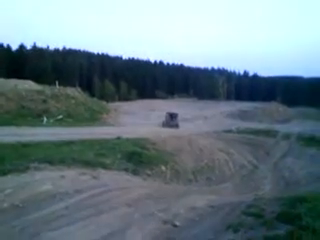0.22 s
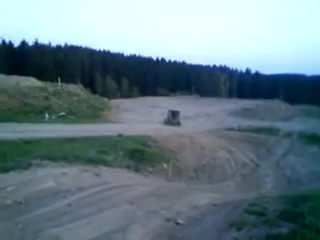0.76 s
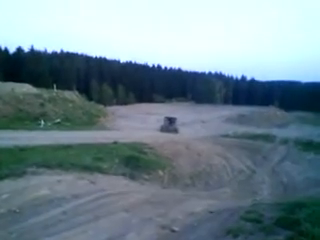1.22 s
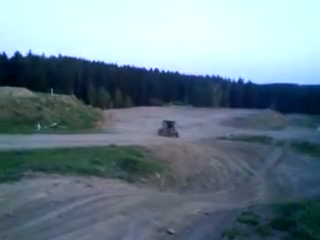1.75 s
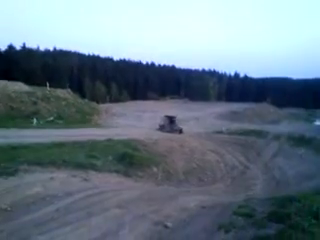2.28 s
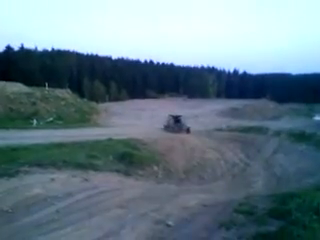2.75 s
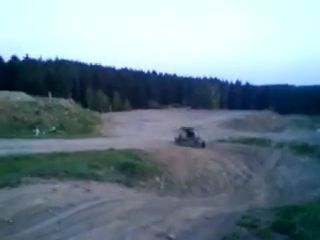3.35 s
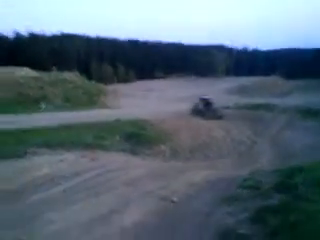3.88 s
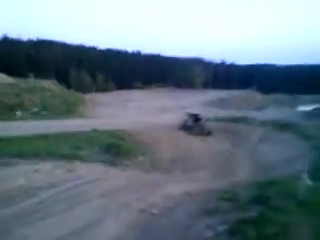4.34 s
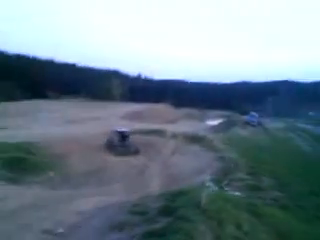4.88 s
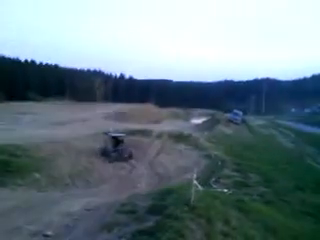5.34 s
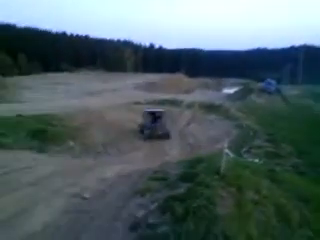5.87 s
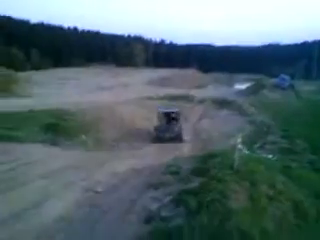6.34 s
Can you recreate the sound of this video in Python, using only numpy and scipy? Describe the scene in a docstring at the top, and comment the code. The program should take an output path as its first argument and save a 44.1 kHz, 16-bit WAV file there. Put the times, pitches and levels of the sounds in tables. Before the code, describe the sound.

An open buggy's rough engine blips its throttle three times, crawls unevenly, then pulls away harder as fingers click on the camera.

```python
"""Three throttle blips, a crawl and a pull-away of an open buggy with an uneven four-cylinder engine on a dirt track.
Pressure pulses boom in the silencer and bark in the tailpipe; a leaking joint rasps, most at one cylinder.
Clattering valve gear and tyres on grit add noise, a loose part chinks, and the forest edge gives a faint echo.
The hand that holds a small camera clicks and rubs on its case, over thin whines and a light breeze."""
import sys
import numpy as np
from scipy import signal
from scipy.fft import rfft, irfft
from scipy.io import wavfile
from scipy.ndimage import uniform_filter1d

SR = 44100
rng = np.random.default_rng(int(sys.argv[2]) if len(sys.argv) > 2 else 0)


def persist_wave(psi):
    """Save psi, clipped to +-1, as 16-bit WAV."""
    counts = np.round(np.clip(psi, -1, 1) * 32767).astype(np.int16)
    wavfile.write(sys.argv[1], SR, np.atleast_2d(counts).T)


N = 291501

# cylinders in firing order: charge_surplus [relative], bark_db, leak_db [before scatter and trims]
CYLINDERS = [(-0.21, -8, -10), (-0.055, -10, -8.5), (0.25, -9, -22), (0.25, -4, 0)]
# throttle bursts, three blips and the pull-away: opens_s, shuts_s, opening_firing_hz, shutting_firing_hz,
# boom_db, bark_db, final_rasp_db, rasp_growth_db [levels before detuning and trims]
THROTTLE = [(0.192, 0.39, 73.36, 84.05, -14, -38, -25.5, 2), (0.719, 1.24, 51.01, 76.87, -16, -39, -29, 3),
            (1.502, 2.27, 40.91, 68.8, -16.5, -43.5, -28.5, 18.5),
            (5.715, 6.639, 65.38, 97.16, -15.5, -29, -33.5, 1)]


def undb(db):
    """The decibel is logarithmic: 20 dB is a factor of ten in amplitude."""
    return 10 ** (np.asarray(db) / 20)


def curves(table):
    """Linear interpolation: each column of a table of (s, ..) rows, sample by sample."""
    s, *columns = np.transpose(table)
    return [np.interp(np.arange(N) / SR, s, c) for c in columns]


def unit(x):
    """Power normalisation: scaled to rms 1."""
    return x / np.sqrt(np.mean(x ** 2))


def steady(x, size=6000):
    """Running power normalisation to rms 1; a long window (samples) keeps the shape of single firings."""
    power = uniform_filter1d(uniform_filter1d(x ** 2, size), size // 2)
    return x / np.sqrt(power + 1e-12)


def noise():
    """White noise: equal mean power at all frequencies."""
    return rng.standard_normal(N)


def walk(rate):
    """Slow random modulation: levels drawn at a rate (Hz) and slewed by a running mean; rms 1."""
    hold = max(int(SR / rate), 1)
    held = noise()[np.arange(N) // hold]
    return unit(uniform_filter1d(held, hold))


def colour(x, points, tilt_db=0, size=8192):
    """Minimum-phase filtering: a causal response of unit energy through (Hz, dB) points, tilted by dB an octave."""
    hz, db = np.transpose(points)
    octave = np.log2(np.maximum(np.arange(size // 2 + 1) * SR / size, 1))
    gain_db = np.interp(octave, np.log2(hz), db + tilt_db * np.log2(hz))
    # beyond either end the response falls by 24 dB an octave
    above, below = np.maximum(octave - np.log2(hz[-1]), 0), np.maximum(np.log2(hz[0]) - octave, 0)
    gain_db -= 24 * (above + below)
    # folding the cepstrum onto positive time gives minimum phase
    cepstrum = irfft(gain_db * np.log(10) / 20)
    ring = irfft(np.exp(rfft(2 * cepstrum[:size // 2], size)))
    return signal.fftconvolve(x, ring / np.linalg.norm(ring))[:len(x)]


def puff(age, rise, fall):
    """Exponential filling and emptying: a puff that swells and dies away, times in units of age."""
    return (1 - np.exp(-age / rise)) * np.exp(-age / fall)


def firings(turns):
    """Cyclic phase: number of the running firing, its cylinder and its age 0-1."""
    number = np.floor(turns).astype(int)
    return number, number % len(CYLINDERS), turns % 1


def churn(turns, repeat, size=1200):
    """Partly periodic turbulence: what comes back alike in every engine cycle forms spectral lines."""
    pattern = rng.standard_normal(size)
    cycle = np.interp(turns / len(CYLINDERS) % 1 * size, np.arange(size), pattern)
    return np.sqrt(repeat) * cycle + np.sqrt(2 * (1 - repeat)) * noise()


def engine_speed():
    """Rotational inertia: the firing rate climbs under throttle, fastest at first, and runs down in between."""
    # idling, then crawling round the bend: time_s, firing_hz
    crawl = [(2.461, 39.68), (2.625, 39.25), (2.826, 52.82), (3.033, 47.47), (3.373, 54.66), (3.59, 49.42),
             (4.153, 55.63), (4.351, 55.68), (4.62, 60.43), (5.002, 60.97), (5.509, 67.03)]
    start_hz = 86.31
    surge_hz = 2.2  # lead over an even climb at the middle of a burst
    t = np.arange(N) / SR
    points, surge = [(0, start_hz), *map(tuple, crawl)], 0
    for opens, shuts, from_hz, to_hz, *_ in THROTTLE:
        points += [(opens, from_hz), (shuts, to_hz)]
        along = np.clip((t - opens) / (shuts - opens), 0, 1)
        surge = surge + surge_hz * (1 - (2 * along - 1) ** 2)
    return curves(sorted(points))[0] + surge


def pedal(opens, shuts):
    """Finite valve travel: the throttle 0-1 opens, holds and shuts in linear ramps."""
    open_s, shut_s = 0.057, 0.027  # lengths of the ramps
    t = np.arange(N) / SR
    return np.clip(np.minimum(.5 + (t - opens) / open_s, 1 - (t - shuts) / shut_s), 0, 1)


def effort(firing_hz, size=4000):
    """Engine load: throttle 0-1, and the boom, bark and rasp levels (dB before trims) that it sets."""
    # edge of the exhaust note while crawling: time_s, bark_db, rasp_db [before trims]
    crawl_edge = [(2.9, -50.5, -34), (3.5, -40.5, -38.5), (4.15, -43.5, -37), (4.8, -42.5, -44),
                  (5.55, -39.5, -37), (5.69, -32, -31.5)]
    crawl_from_s, crawl_to_s = 2.68, 5.74
    crawl_boom_db, crawl_swell_db, swell_hz_per_s = -18.5, 1, 12
    # levels with the throttle shut, before detuning and trims
    boom_db, bark_db, rasp_db = -25.5, -64.5, -43
    edge_lead_s = .028  # bark and rasp die this long before the boom
    # the silencer booms most at one firing rate and less on either side
    tuned_hz, detuned_db_per_octave = 70.2, 4
    t = np.arange(N) / SR

    # while crawling, the boom swells as the engine gathers speed
    hz_per_s = uniform_filter1d(np.gradient(firing_hz) * SR, size)
    crawl_boom = crawl_boom_db + crawl_swell_db * np.tanh(hz_per_s / swell_hz_per_s)
    strokes = [(crawl_from_s, crawl_to_s, crawl_boom, *curves(crawl_edge))]
    for opens, shuts, _, _, open_boom, open_bark, open_rasp, growth in THROTTLE:
        to_go = np.clip((shuts - t) / (shuts - opens), 0, 1)
        strokes.append((opens, shuts, open_boom, open_bark, open_rasp - growth * to_go ** 2))

    throttle = 0
    for opens, shuts, open_boom, open_bark, open_rasp in strokes:
        press, edge = pedal(opens, shuts), pedal(opens, shuts - edge_lead_s)
        throttle = np.maximum(throttle, press)
        boom_db = boom_db + press * (open_boom - boom_db)
        bark_db = bark_db + edge * (open_bark - bark_db)
        rasp_db = rasp_db + edge * (open_rasp - rasp_db)
    detuned_octaves = np.abs(np.log2(firing_hz / tuned_hz))
    return throttle, boom_db - detuned_db_per_octave * detuned_octaves, bark_db, rasp_db


def exhaust(turns, throttle, boom_db, valve_lag=0.13, thump_lag=0.13, coast_lead=0.27,
            scatter_db=2.39, trim_db=-1.8, harmonics=10):
    """Forced resonance: pulses ring the silencer, over a thump at the firing rate, earlier when coasting."""
    # resonances of the silencer: frequency_hz, level_db [relative]
    silencer = [(30, -39.5), (60, 10), (85, 2.5), (115, 2), (155, 4), (185, -2), (212, -11.5), (245, -8.5),
                (280, -16), (320, -17), (380, -34.5), (460, -40.5), (900, -53)]
    # thump at the firing rate: time_s, level_db [rms]
    thump_levels = [(0.0, -20), (0.3, -25.5), (1.2, -26), (1.6, -32), (2.25, -25), (2.36, -35),
                    (5.68, -39.5), (5.77, -24), (6.25, -19.5), (6.6, -21.5)]
    jitter = .003  # spread of the timing, in firing intervals, as are the lags and the lead
    thump_db, = curves(thump_levels)
    number, _, age = firings(turns - valve_lag + .5)
    angle = 2 * np.pi * (age - .5 - jitter * noise()[number])
    # the pulses leave out the fundamental, which the thump mainly supplies
    pulse = sum(np.cos(k * angle) for k in range(2, harmonics + 1))
    pulses = undb(scatter_db * noise()[number]) * pulse
    thump = np.sqrt(2) * np.cos(2 * np.pi * (turns - thump_lag + coast_lead * (1 - throttle)))
    boom = steady(colour(pulses, silencer)) * undb(boom_db + trim_db)
    return boom + thump * undb(thump_db)


def lope(turns, boom_db, lag=0.038, full_db=-27.5, below_boom_db=9):
    """Subharmonic excitation: unequal charges rock the manifold gas once a cycle; shut throttle weakens it."""
    # resonances of the manifold: frequency_hz, level_db [relative]
    manifold = [(40, -15), (80, -8), (115, -4.5), (136, -0.5), (155, -3.5), (185, -9.5), (215, -9),
                (270, -19), (315, -10), (350, -19), (420, -39.5), (700, -45.5)]
    charge_scatter = .04  # relative
    number, cylinder, _ = firings(turns - lag)
    surplus = np.transpose(CYLINDERS)[0][cylinder] + charge_scatter * noise()[number]
    kicks = surplus * np.diff(number, prepend=number[0])
    level_db = np.minimum(full_db, boom_db - below_boom_db)
    return steady(colour(kicks, manifold)) * undb(level_db)


def bark(turns, firing_hz, level_db, lag=0.036, gas=0.1, repeat=0.79, scatter_db=2.0, trim_db=-4.5):
    """Pipe resonance: steep pulse fronts and gas ring the tailpipe; a higher colour takes over at high revs."""
    # tailpipe at lower revs: frequency_hz, level_db [relative]
    tailpipe = [(250, -32), (450, -17), (560, 2.5), (650, 5.5), (820, 0.5), (1000, -12), (1400, -11),
                (2100, -11), (2600, -39), (4000, -23.5), (6000, -51.5)]
    # tailpipe at high revs: frequency_hz, level_db [relative]
    snarl = [(450, -20.5), (700, -4), (830, 3), (960, -1.5), (1150, -10), (1500, -14), (2100, -16.5),
             (2600, -33)]
    # firing rate at the middle of the change, its spread, and the greatest share of the power
    snarl_from_hz, snarl_spread_hz, snarl_share = 87, 2.1, .7
    number, cylinder, age = firings(turns - lag)
    front = np.diff(number, prepend=number[0])
    size = undb(np.transpose(CYLINDERS)[1][cylinder] + scatter_db * noise()[number])
    gas_flow = gas * churn(turns, repeat) * (puff(age, 0.011, .45) + 0.037)
    flow = size * (front + gas_flow)
    high = snarl_share / (1 + np.exp((snarl_from_hz - firing_hz) / snarl_spread_hz))
    low_rev_tone = np.sqrt(1 - high) * steady(colour(flow, tailpipe))
    high_rev_tone = np.sqrt(high) * steady(colour(flow, snarl))
    return (low_rev_tone + high_rev_tone) * undb(level_db + trim_db)


def rasp(turns, level_db, lead=0.24, scatter_db=-1.0, trim_db=-0.5):
    """Turbulent jet noise: gas spits from a leaking joint, hardest once every four firings."""
    # spectrum of the leaking jet: frequency_hz, level_db [relative]
    leak = [(300, -27.5), (600, -16), (820, -5), (1020, -13.5), (1170, 2), (1310, 2.5), (1500, -1.5),
            (1750, -20.5), (2100, -19), (2900, -29.5), (3400, -25.5), (3800, -38), (5000, -42), (8000, -40)]
    leak_repeat = .75  # share of the turbulence that repeats each cycle
    number, cylinder, age = firings(turns + lead)
    size = undb(np.transpose(CYLINDERS)[2][cylinder] + scatter_db * noise()[number])
    spit = puff(age, 0.056, 0.73)
    jet = steady(colour(churn(turns, leak_repeat), leak), size=500)
    return jet * size * spit / spit.max() * undb(level_db + trim_db)


def running_gear(turns):
    """Impact and contact noise: valve gear clatters twice a firing interval; tyres crunch over grit."""
    # running gear through the drive: time_s, clatter_db, tyre_db [before trims]
    gear_levels = [(0.0, -38.5, -47.5), (0.45, -43.5, -52.5), (2.0, -41.5, -50), (2.5, -45, -50.5),
                   (2.9, -38.5, -47), (3.5, -44, -50), (4.1, -41, -44), (5.0, -43.5, -44.5),
                   (5.55, -36, -41.5), (5.9, -38.5, -47.5), (6.3, -36.5, -44.5)]
    # spectrum of the engine clatter: frequency_hz, level_db [relative]
    clatter_colour = [(200, -11), (450, -1.5), (700, 5), (980, -4), (1250, 4), (1500, -0.5), (1800, -14),
                      (2400, -13.5), (5000, -42)]
    # spectrum of tyres and gears: frequency_hz, level_db [relative]
    tyre_colour = [(900, -18.5), (1500, 0.5), (1850, -1), (2150, -4), (2500, -9.5), (3300, -10.5),
                   (4000, -10.5), (5000, -17), (6200, -15), (7200, -36)]
    clatter_db, tyre_db = curves(gear_levels)
    tick = 1.8 + puff(2 * turns % 1, 0.16, 0.9)
    clatter = unit(colour(noise() * tick * undb(1.7 * walk(45)), clatter_colour))
    grit = noise() * undb(2.5 * walk(900) + 1.0 * walk(25))
    crunch = unit(colour(grit, tyre_colour))
    return clatter * undb(clatter_db - 5.0) + crunch * undb(tyre_db - 1.0)


def rattle(spread_db=3, size=4096):
    """Damped free vibration: a loose metal part on the frame chinks faintly at random times."""
    pitch_hz, t60_s, ticks_per_s, typical_db = 3360, 0.029, 7, -47.5
    t = np.arange(size) / SR
    ring = np.sin(2 * np.pi * pitch_hz * t) * np.exp(-np.log(1000) * t / t60_s)
    knocks = (rng.random(N) < ticks_per_s / SR) * undb(typical_db + spread_db * noise())
    return signal.fftconvolve(knocks, ring)[:N]


def handling(click_db=1.5, grain_db=2.5, size=16384):
    """Impact and friction: fingers tap and slide on the camera case in sharp ticks and grainy swishes."""
    # finger clicks: time_s, level_db [before click_db], decay_s, tilt_db_per_octave, low_edge_hz
    clicks = [(2.545, -26.5, 0.0037, -7, 295), (3.128, -16, 0.0063, -2.5, 150),
              (3.385, -28.5, 0.014, -7, 280), (3.447, -21, 0.0015, -1.5, 300), (3.510, -16, 0.0013, 0, 150),
              (3.764, -22, 0.007, -2.5, 200), (3.778, -27, .003, 6, 300), (4.067, -29.5, 0.00086, 8, 500),
              (4.170, -21.5, 0.0015, 24, 800), (4.714, -26, 0.0079, 5.5, 200),
              (4.722, -21, 0.0058, 0.5, 200), (4.729, -18, 0.0047, 3, 200),
              (5.249, -26.5, 0.0041, -0.5, 400), (6.291, -16, 0.001, -3.5, 600),
              (6.517, -30, 0.0016, -4, 900), (6.551, -8.5, 0.0012, -3.5, 830),
              (6.5655, -27, 0.0019, -5, 1500)]
    # finger rubs: middle_s, level_db [before the grain], half_length_s, tilt_db_per_octave
    rubs = [(3.156, -43.5, 0.014, 2.5), (3.379, -34, 0.048, -3), (3.48, -35.5, 0.045, -3.5),
            (3.533, -39.5, 0.011, 0), (3.7, -33.5, 0.0095, 0), (3.835, -34, 0.046, -0.5),
            (3.902, -37, 0.044, -2), (4.31, -37.5, 0.052, -2), (4.406, -32.5, 0.025, -1),
            (4.717, -25.5, 0.014, -1.5)]
    # response of the tapped case: frequency_hz, level_db [relative]
    case = [(100, -28.5), (350, 13.5), (520, 1.5), (700, 3.5), (1000, 0), (1500, -1), (2400, -6.5),
            (4200, -4.5), (5500, -8), (7000, -21)]
    # spectrum of skin sliding on the case: frequency_hz, level_db [relative]
    skin = [(200, 9), (400, 0), (700, 1.5), (1000, -8.5), (1600, -4), (2500, -5.5), (3900, -4),
            (5200, -8.5), (7000, -15.5)]
    out, t = np.zeros(N + size), np.arange(size) / SR
    for s, db, decay, tilt_db, low_hz in clicks:
        tick = rng.standard_normal(size) * np.exp(-t / decay)
        # a nail leaves out the low knock that a fingertip gives
        high_pass = signal.butter(2, low_hz, "high", fs=SR, output="sos")
        tick = signal.sosfilt(high_pass, colour(tick, case, tilt_db))
        # the energy is that of decaying noise that starts at rms 1
        tick = tick * np.sqrt(decay * SR / 2) / np.linalg.norm(tick)
        out[int(s * SR):][:size] += undb(db + click_db) * tick
    grain = undb(grain_db * walk(400))
    for s, db, half, tilt_db in rubs:
        start = int(s * SR) - size // 2
        swell = np.exp(-.5 * ((t - t.mean()) / half) ** 2)
        slide = rng.standard_normal(size) * grain[start:][:size] * swell
        out[start:][:size] += undb(db) * colour(slide, skin, tilt_db)
    return out[:N]


def forest(x, fade_s=0.15):
    """Diffuse reflection: the tree line sends back a dull, scattered echo that builds up, then fades."""
    build_s, echo_db = 0.031, -26  # the level is that before the treble loss
    t = np.arange(SR) / SR
    tail = rng.standard_normal(SR) * np.exp(-t / fade_s) * np.minimum(t / build_s, 1) ** 2
    dulling = signal.butter(1, 2500, fs=SR, output="sos")
    tail = signal.sosfilt(dulling, tail / np.linalg.norm(tail))
    return undb(echo_db) * signal.fftconvolve(x, tail)[:N]


def whine():
    """Narrow-band resonance: noise through sharp peaks gives thin whines that swell and fade."""
    # whines: centre_s, half_length_s, pitch_hz, width_hz, level_db [rms at the centre]
    whines = [(1.206, 1.8, 4180, 69.7, -66), (5.088, 0.38, 1780, 26, -50)]
    t, out = np.arange(N) / SR, 0
    for s, half, hz, width_hz, db in whines:
        tone = unit(signal.lfilter(*signal.iirpeak(hz, hz / width_hz, fs=SR), noise()))
        out = out + tone * undb(db) * np.exp(-.5 * ((t - s) / half) ** 2)
    return out


def open_air():
    """Broadband turbulence: a light breeze and the distant hush of the valley, gently wavering."""
    # spectrum of the open air: frequency_hz, level_db [relative]
    air = [(20, -2.5), (45, -9.5), (100, -12), (250, 3.5), (420, -28), (1000, -21.5), (3000, -35.5),
           (7000, -38.5)]
    air_db = -44  # rms
    return unit(colour(noise() * undb(2 * walk(3.9)), air)) * undb(air_db)


def scene():
    """Superposition: engine sounds share one crank phase; engine and running gear are echoed, the chinks are not."""
    firing_hz = engine_speed()
    turns = np.cumsum(firing_hz) / SR  # counted in firings
    throttle, boom_db, bark_db, rasp_db = effort(firing_hz)
    buggy = exhaust(turns, throttle, boom_db) + lope(turns, boom_db)
    buggy = buggy + bark(turns, firing_hz, bark_db) + rasp(turns, rasp_db) + running_gear(turns)
    surroundings = forest(buggy) + whine() + open_air()
    return (buggy + rattle() + handling() + surroundings)[None]


def record(dry):
    """Band limitation: the small camera cuts steeply above 7200 Hz."""
    return signal.sosfilt(signal.ellip(8, .3, 70, 7200, fs=SR, output="sos"), dry)


dry = scene()
out = record(dry)
persist_wave(out)
```